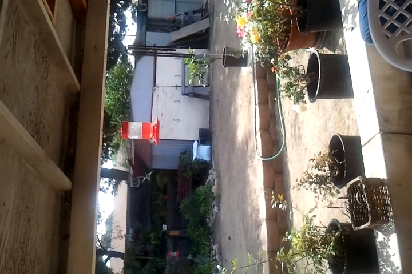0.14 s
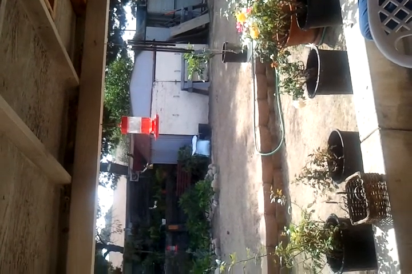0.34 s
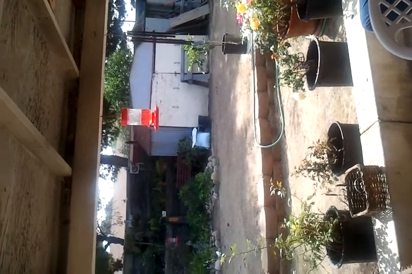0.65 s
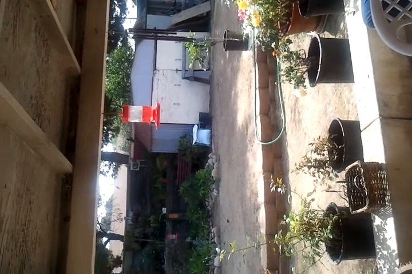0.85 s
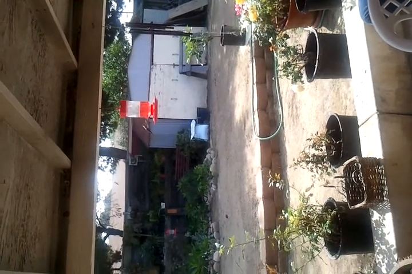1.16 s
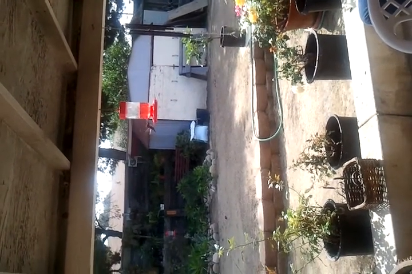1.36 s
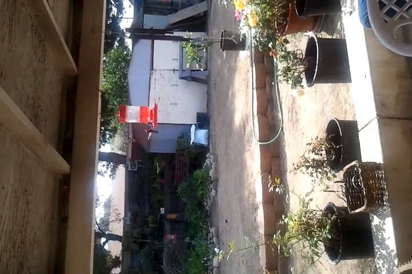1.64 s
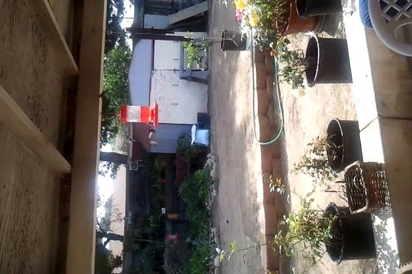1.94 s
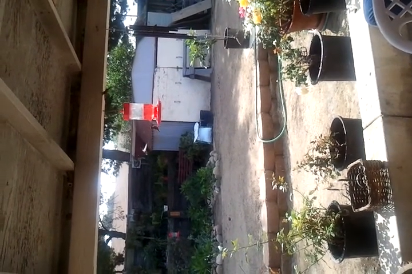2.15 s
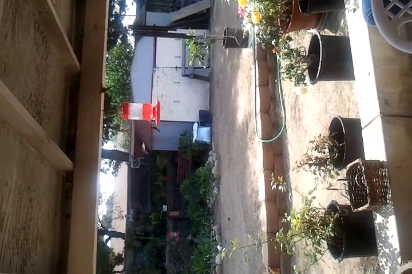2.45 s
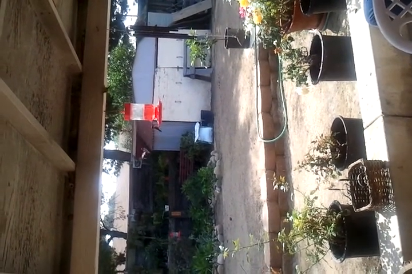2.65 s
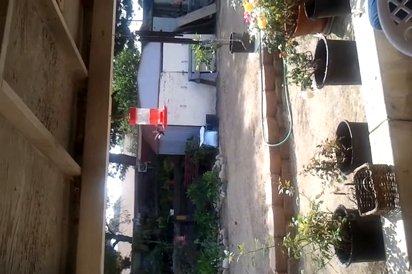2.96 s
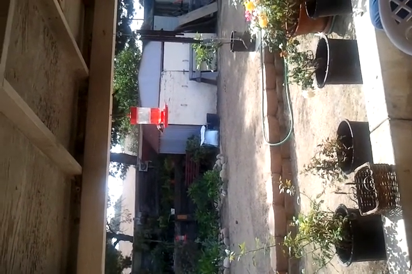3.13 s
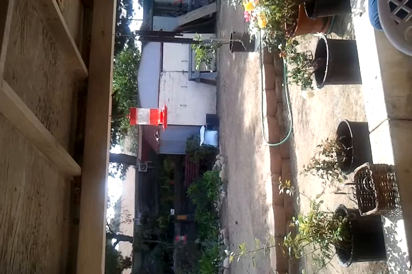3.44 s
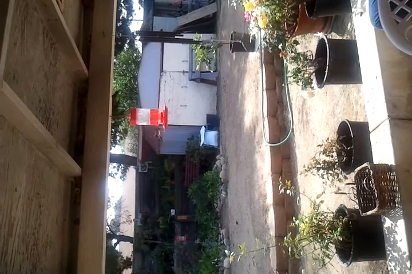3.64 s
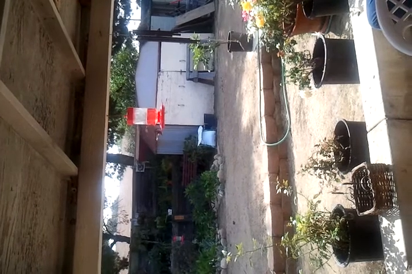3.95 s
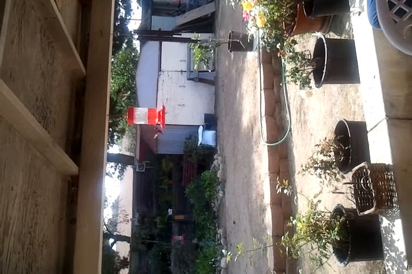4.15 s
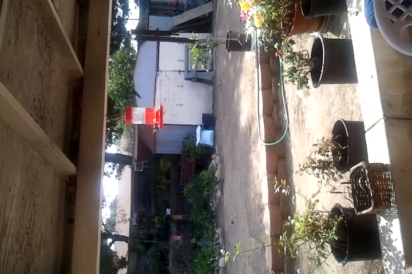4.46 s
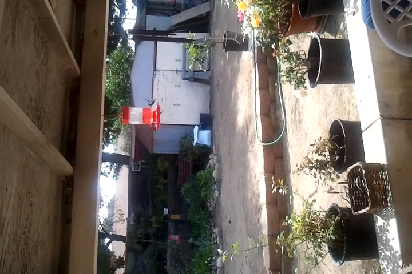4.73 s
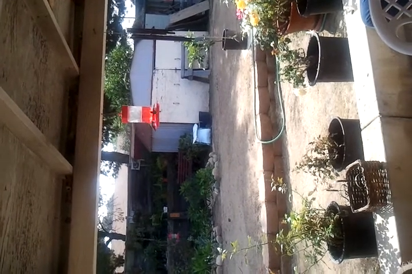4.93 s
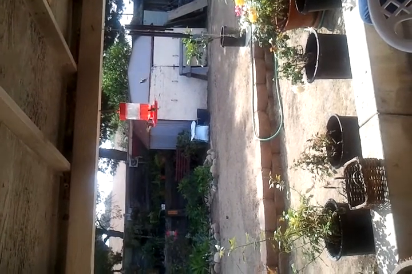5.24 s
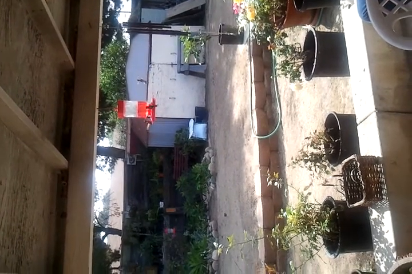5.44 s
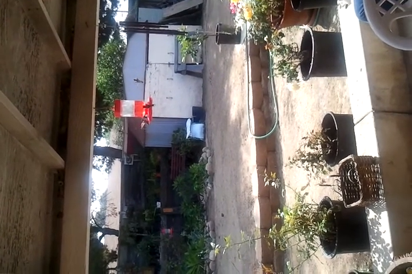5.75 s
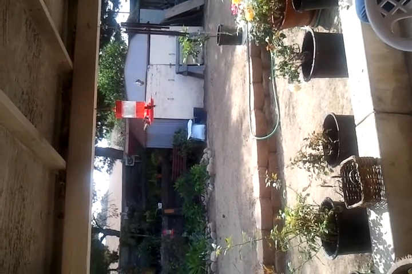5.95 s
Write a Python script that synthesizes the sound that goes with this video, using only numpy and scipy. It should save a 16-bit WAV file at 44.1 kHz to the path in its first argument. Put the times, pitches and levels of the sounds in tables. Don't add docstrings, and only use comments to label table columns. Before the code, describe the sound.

Short dry bird chips and a few hard clicks close by in a backyard, with faint whistles and low road rumble behind.

```python
import sys
import numpy as np
from scipy import signal
from scipy.fft import rfft, irfft, next_fast_len
from scipy.io import wavfile
from scipy.ndimage import uniform_filter1d, map_coordinates

SR = 44100
rng = np.random.default_rng(int(sys.argv[2]) if len(sys.argv) > 2 else 0)


def generate_wav(signal):
    frames = np.transpose(np.atleast_2d(signal))
    scaled = np.clip(frames, -1, 1) * 32767
    pcm = np.round(scaled).astype(np.int16)
    wavfile.write(sys.argv[1], SR, pcm)


def boost_factor(decibels):
    exponent = np.asarray(decibels, float) / 20
    return 10 ** exponent


N = 268569

RUMBLE_DB, DRONE_DB, ROAR_DB, HISS_DB, WHINE_DB = -48.5, -51, -53.5, -58.5, -68
HISS_FOLLOWS, WHINE_FOLLOWS = 0.25, 1.8

# pitch_hz, density_db (per Hz)
RUMBLE_SPECTRUM = [(10, -40), (22, -7), (38, 2.5), (50, -1), (65, -2.5), (80, -7), (110, -39), (200, -76.5)]
DRONE_SPECTRUM = [(60, -53), (80, -18.5), (96, 4.5), (108, -5), (122, -1.5), (140, -8), (170, -16.5),
                  (260, -65.5)]
ROAR_SPECTRUM = [(88, -16.5), (150, -0.5), (225, -3.5), (268, -3.5), (306, -4.5), (500, -11.5), (800, -35),
                 (1760, -120)]
HISS_SPECTRUM = [(350, -22.5), (600, -3), (970, -6.5), (1700, -10.5), (2600, -13), (5600, -14.5),
                 (8200, -18), (9500, -80.5)]
WHINE_SPECTRUM = [(235, -60), (258, -6), (266, 3), (276, -2.5), (300, -57.5)]
NEAR_TYRE_SPECTRUM = [(300, -58), (400, -5.5), (520, 0.5), (650, -6), (900, -21), (1500, -58.5)]

# centre_s, half_length_s, swell_db
AIR_PUFFS = [(.1, .1, 3), (.45, 0.11, 4), (.72, 0.12, 4), (1.35, 0.091, 0.5), (2.2, .15, 4),
             (2.53, 0.081, 7), (2.87, 0.21, 7), (3.4, .15, 4), (3.67, 0.13, 4), (4.05, 0.17, 5),
             (5.45, 0.076, 4), (6.0, 0.12, 5)]
# centre_s, half_length_s, swell_db
ENGINE_PULLS = [(.35, 0.41, 2.5), (.8, 0.085, 6), (1.12, 0.16, 5), (1.42, 0.19, 5), (2.1, 0.71, 4),
                (2.8, 0.11, 3.5), (3.48, 0.3, 8.5), (4.05, 0.33, 5), (4.6, 0.31, 3), (5.27, 0.092, 3.5),
                (5.6, 0.095, 2)]
# centre_s, half_length_s, swell_db
FAR_PASSES = [(.12, 0.33, 7), (.62, 0.36, 3.5), (1.3, 0.16, 2.5), (1.7, 0.15, 7), (2.15, 0.12, 4.5),
              (2.55, 0.12, 1.5), (3.17, 0.097, 6.5), (3.48, 0.18, 3.5), (4.03, .16, 6.5), (4.4, 0.071, 3.5),
              (4.8, 0.19, 2), (5.27, .14, 6.5), (5.5, 0.11, 0.5), (5.8, 0.054, 1.5)]
# centre_s, half_length_s, level_db
NEAR_PASSES = [
    (0.155, 0.092, -61.5),
    (0.904, 0.1, -60.5),
    (2.145, .1, -64),
    (3.326, 0.27, -59.5),
    (4.25, 0.2, -63.5),
    (5.407, 0.091, -67),
]

# pitch_hz, t60_s
YARD_DECAY = [(1000, 0.19), (3000, 0.2), (6000, 0.26), (8000, 0.22)]
# pitch_hz, level_db
WALL_COLOUR = [(1000, 6), (3000, -5), (5500, -6), (6500, -1.5), (7500, -3)]

# start_s, length_s, start_hz, end_hz, level_db
WHISTLES = [
    (1.934, .046, 4850, 5750, -45),
    (1.952, .075, 5050, 5080, -54),
    (.025, .022, 1450, 1650, -56),
    (.095, .04, 3900, 3400, -59),
    (.555, .06, 3300, 3650, -62),
    (.415, .022, 1250, 1300, -59),
    (3.79, .03, 3900, 3300, -59),
    (3.62, .04, 3600, 3400, -63),
    (5.895, .05, 3700, 3000, -60),
]
WHISTLE_ECHO_DB = -0.5

# start_s, peak_db, pitch_hz, echo_db
FEEDER_TICKS = [
    (0.2795, -38.5, 5040, 7),
    (.3012, -48, 5120, -1),
    (2.9361, -33, 5000, 4.5),
    (2.9394, -44, 4500, 1),
    (2.9496, -38, 2600, -1),
    (3.414, -36, 5150, -2),
]

# plunge_start_s, peak_db, folded_overtone_db, lead_in_db, echo_db
HUMMINGBIRD_CHIPS = [(0.0784, -36.5, -2.5, -7, 7.5), (0.486, -51.5, -11, -6, 5.5),
                     (0.6454, -31, -23, -8, 1.5), (1.018, -53.5, -13, -0.5, 5), (1.2103, -40, -3, -7, 2.5),
                     (1.505, -38.5, -14, -6, 1.5), (1.5622, -35.5, -2, -9, -1), (1.6352, -33, 0, -9, -4),
                     (1.9364, -48.5, -8, -7, 6), (2.0268, -30.5, -9, -4.5, -3.5),
                     (2.0996, -30, -5, -6.5, -1.5), (2.346, -36.5, -2, -6.5, -0.5),
                     (2.6602, -35.5, 0, -1, 0), (2.9992, -36.5, -8, -1, -2), (3.058, -33, -9.5, -6, 0.5),
                     (3.4733, -39, -5.5, -2.5, -1), (3.849, -46.5, -9.5, -7, 3),
                     (3.965, -48, -5, -10, 11.5), (4.1553, -35.5, -13, -6.5, 1.5),
                     (4.6678, -39.5, -11, -3.5, 0), (4.7318, -37, -17, -12.5, 2.5),
                     (4.9148, -51, -10, -4, 3.5), (5.3413, -36.5, -13, -4.5, -2),
                     (6.0442, -33.5, -13, -15, 3)]
# pitch_hz, level_db
RASP_COLOUR = [(700, -16.5), (1200, -16.5), (2000, -14), (4000, -11), (5500, -6.5), (6800, -6), (8200, 3),
               (9500, -67)]
END_HZ, END_SCATTER = 4573, 0.029

RATE_HZ = 16000
# pitch_hz, level_db
LOW_PASS = [(6600, 2.5), (7050, -2), (7300, -7), (7550, -15.5), (7750, -31.5), (7900, -78)]
# pitch_hz, level_db
MIRROR_LEAK = [(7800, -81), (7950, -35), (8050, -36.5), (8200, -54), (8400, -27), (8900, -34.5),
               (9200, -47.5), (9300, -100)]
# start_s, level_db
GLITCH_AT = (3.5162, -40)
# start_s, lift_db
GAIN_LIFTS = [(.62, 5.5), (1.53, .9), (1.6, 1.7), (2.01, 4.3), (2.63, 2.6), (3.0, 3.5), (3.94, 1.9),
              (4.11, 2.2), (4.67, 1.0), (5.04, 1.5), (5.27, 5.7), (6.0, 2.2)]
OFFSET_DB, SINK_DB_PER_S, LIFT_S = -15.8, 5.96, .0476


def unit(x):
    return x / np.sqrt(np.mean(x ** 2) + 1e-20)


def along(points, hz):
    f, v = np.transpose(points)
    return np.interp(np.log(hz + 1), np.log(f + 1), v)


def wobble(rate, size):
    knots = rng.standard_normal(int(size * 2000 / SR) + 4)
    return map_coordinates(knots, [np.arange(size) * min(rate, 2000) / SR])


def coloured(x, points):
    m = next_fast_len(len(x) + 8192)
    gain = boost_factor(along(points, np.fft.rfftfreq(m, 1 / SR)))
    return irfft(rfft(x, m) * gain, m)[:len(x)]


def rush(spectrum, patchy_db):
    z = signal.stft(rng.standard_normal(N), nperseg=512)[2]
    patches = uniform_filter1d(rng.standard_normal(z.shape), size=5, axis=0)
    patches = uniform_filter1d(patches, size=12, axis=1)
    noise = signal.istft(z * boost_factor(patchy_db * unit(patches)), nperseg=512)[1][:N]
    return unit(coloured(noise, spectrum))


def bells(rows):
    t = np.arange(N) / SR
    return sum(height * np.exp(-((t - s) / half) ** 2) for s, half, height in rows)


def echoed(x, echo_db, drive=None):
    hz, t, z = signal.stft(rng.standard_normal(SR // 3), SR, nperseg=128)
    decay = boost_factor(-60 * t / along(YARD_DECAY, hz)[:, None])
    tail = signal.istft(z * decay, SR, nperseg=128)[1]
    tail = coloured(tail, WALL_COLOUR)
    if drive is None:
        drive = x
    else:
        drive = drive * np.linalg.norm(x) / np.linalg.norm(drive)
    tail = signal.fftconvolve(drive, tail / np.linalg.norm(tail))
    return boost_factor(echo_db) * tail + np.pad(x, (0, len(tail) - len(x)))


def add(track, s, sound):
    part = track[round(s * SR):][:len(sound)]
    part += sound[:len(part)]


def far_traffic():
    cars_db = bells(FAR_PASSES)
    rumble = boost_factor(RUMBLE_DB + bells(AIR_PUFFS)) * rush(RUMBLE_SPECTRUM, patchy_db=-0.5)
    drone_db = DRONE_DB + bells(ENGINE_PULLS) + 0.33 * wobble(3.4, size=N)
    drone = boost_factor(drone_db) * rush(DRONE_SPECTRUM, patchy_db=0.5)
    roar_db = ROAR_DB + cars_db + 0.44 * wobble(4.1, size=N)
    roar = boost_factor(roar_db) * rush(ROAR_SPECTRUM, patchy_db=1.0)
    hiss = boost_factor(HISS_DB + HISS_FOLLOWS * cars_db) * rush(HISS_SPECTRUM, patchy_db=1.04)
    whine = boost_factor(WHINE_DB + WHINE_FOLLOWS * cars_db) * rush(WHINE_SPECTRUM, patchy_db=3.0)
    return rumble + drone + roar + hiss + whine


def near_cars():
    level = bells([(s, half, boost_factor(db)) for s, half, db in NEAR_PASSES])
    return level * rush(NEAR_TYRE_SPECTRUM, patchy_db=1.0)


def distant_whistles():
    out = np.zeros(N)
    for s, length, start_hz, end_hz, db in WHISTLES:
        t = np.arange(SR // 10) / SR
        u = t / length
        smear_hz = (.015 + .007 * max(-52 - db, 0)) * start_hz * wobble(300, size=len(u))
        pitch_hz = start_hz + (end_hz - start_hz) * u + smear_hz
        phase = 2 * np.pi * np.cumsum(pitch_hz) / SR
        throb = 1 - .35 * np.cos(2 * np.pi * 95 * t + .6)
        swell = np.sin(np.pi * np.clip(u, 0, 1))
        add(out, s, echoed(boost_factor(db) * swell * throb * np.sin(phase), WHISTLE_ECHO_DB))
    return out


def feeder_ticks():
    out, t = np.zeros(N), np.arange(SR // 200) / SR
    for s, db, hz, echo_db in FEEDER_TICKS:
        snap = boost_factor(db - 60 * t / .002) * np.sin(2 * np.pi * hz * t)
        add(out, s, echoed(snap, echo_db))
    return out


def hummingbird_chips():
    out, t = np.zeros(N), np.arange(SR // 40) / SR - .014
    u = t - .0016
    v = u + .0108
    for s, db, fold_db, lead_db, echo_db in HUMMINGBIRD_CHIPS:
        end_hz = END_HZ * (1 + END_SCATTER * rng.standard_normal())
        top_hz = 7150 * (1 + 0.0137 * rng.standard_normal())
        slide_hz = 500 * np.exp(-np.clip(v, 0, 1) / 0.00245)
        drop_hz = (top_hz - end_hz) / (1 + np.exp((u - .001) / 0.001103))
        pitch_hz = end_hz + drop_hz + slide_hz + 420 * wobble(900.3, size=len(t))
        phase = 2 * np.pi * np.cumsum(pitch_hz) / SR

        plunge = np.exp(-.5 * (u / 0.0021) ** 2)
        lead = boost_factor(lead_db) / (1 + np.exp(-v / 0.0016)) / (1 + np.exp((u + 0.0022) / 0.00044))
        flutter = boost_factor(2.2 * wobble(1100, size=len(t)))
        fold_level = boost_factor(fold_db) * np.exp(-.5 * ((u + 0.00017) / 0.0021) ** 2)
        fold = fold_level * np.sin(2 * np.pi * RATE_HZ * t - 2 * phase)
        slip_hz = 1800 + 5200 / (1 + np.exp((v - .0035) / 0.0013))
        slip_level = boost_factor(-13.5) * lead * np.exp(-.5 * ((v - .0035) / 0.012) ** 2)
        slip = slip_level * np.sin(2 * np.pi * np.cumsum(slip_hz) / SR)
        breath = unit(coloured(rng.standard_normal(len(t)), RASP_COLOUR))
        rasp = breath * (boost_factor(-2.5) * plunge + boost_factor(-.7) * lead)
        tone = (plunge + lead) * np.sin(phase) + slip + fold
        voice = boost_factor(db - 5.5) * (flutter * tone + rasp)

        fall = np.sin(2 * np.pi * (5000 * u - 6e5 * u ** 2)) * np.exp(-(u / .003) ** 4)
        lead_fall = boost_factor(lead_db) * np.roll(fall, -round(0.0096 * SR))
        heard = coloured(fall + lead_fall, RASP_COLOUR)
        add(out, s + t[0], echoed(voice, echo_db, heard))
    return out


def scene():
    background = far_traffic() + near_cars()
    birds = distant_whistles() + feeder_ticks() + hummingbird_chips()
    return (background + birds)[None]


def riding_gain():
    t = np.arange(N) / SR
    gain_db = OFFSET_DB - SINK_DB_PER_S * t
    for s, lift_db in GAIN_LIFTS:
        u = np.clip(t - s, 0, None) / LIFT_S
        gain_db = gain_db + lift_db * (1 - (1 + u) * np.exp(-u))
    return boost_factor(gain_db)


def top_cut(x):
    return signal.sosfilt(signal.butter(12, 15800, fs=SR, output="sos"), x)


def record(dry):
    gain = riding_gain()
    x = dry[0] * gain / np.mean(gain)
    mirror = 2 * x * np.cos(2 * np.pi * RATE_HZ * np.arange(N) / SR)
    offset = -gain
    mix = coloured(x, LOW_PASS) + coloured(mirror, MIRROR_LEAK) + offset
    glitch_s, glitch_db = GLITCH_AT
    mix[round(glitch_s * SR)] += boost_factor(glitch_db)
    return top_cut(mix[None])


dry = scene()
out = record(dry)
generate_wav(out)
```